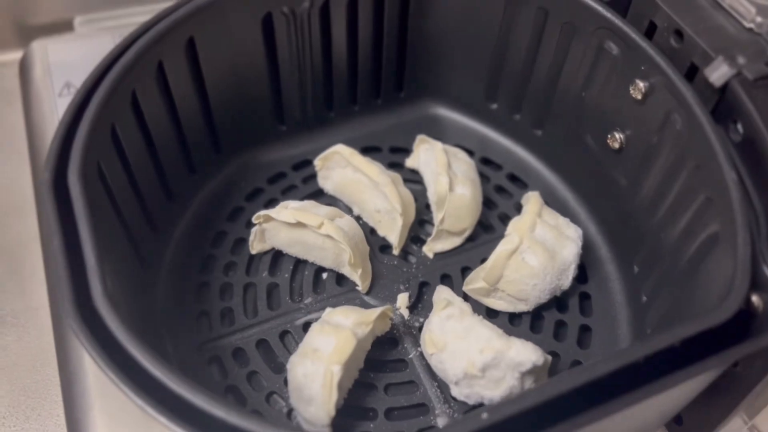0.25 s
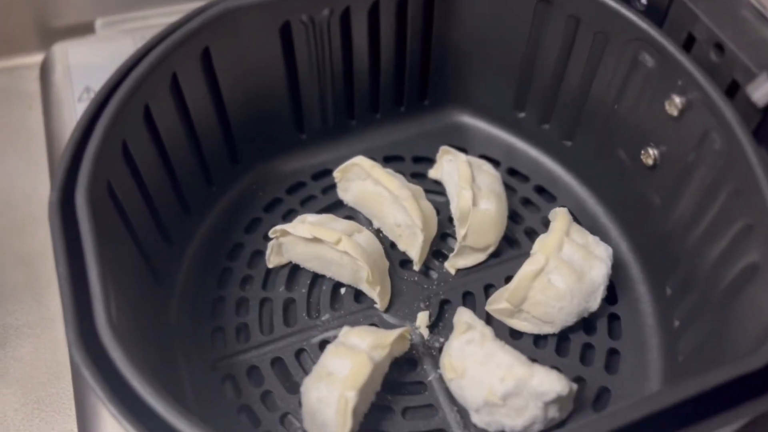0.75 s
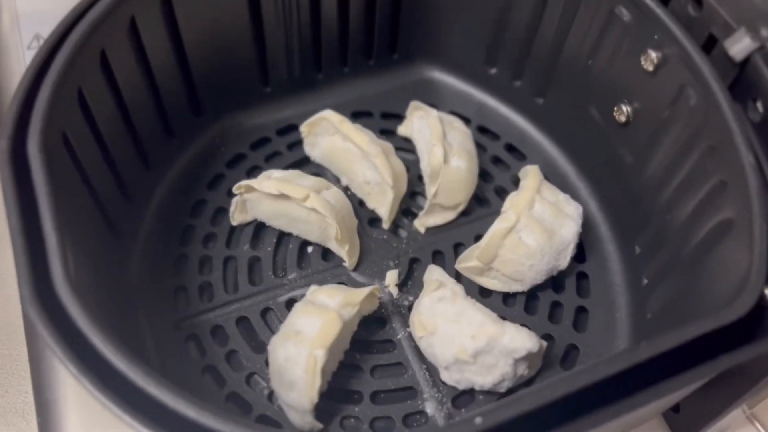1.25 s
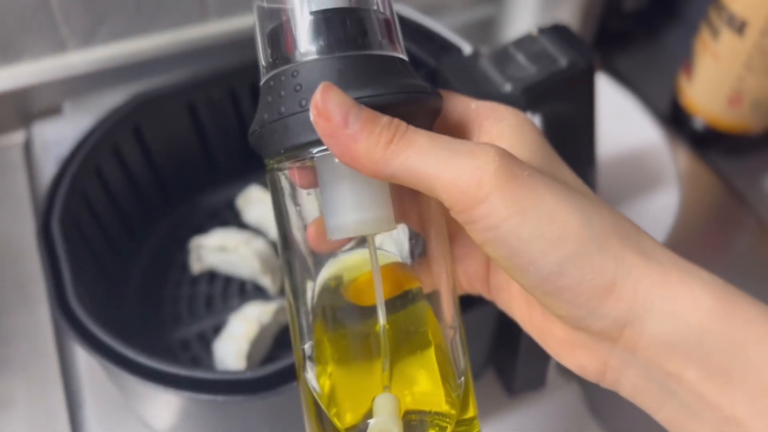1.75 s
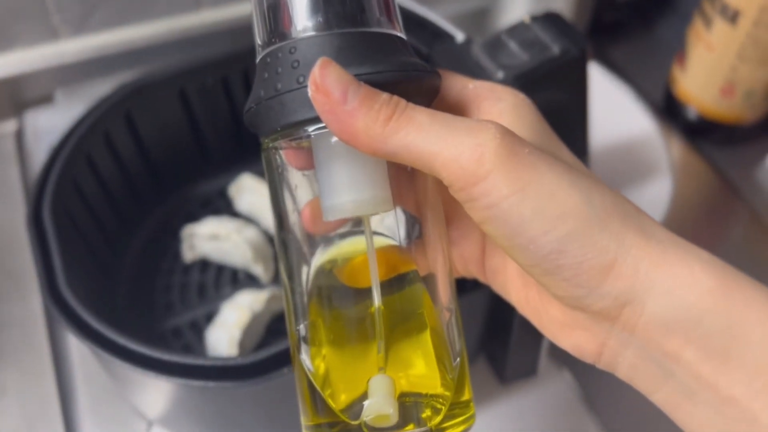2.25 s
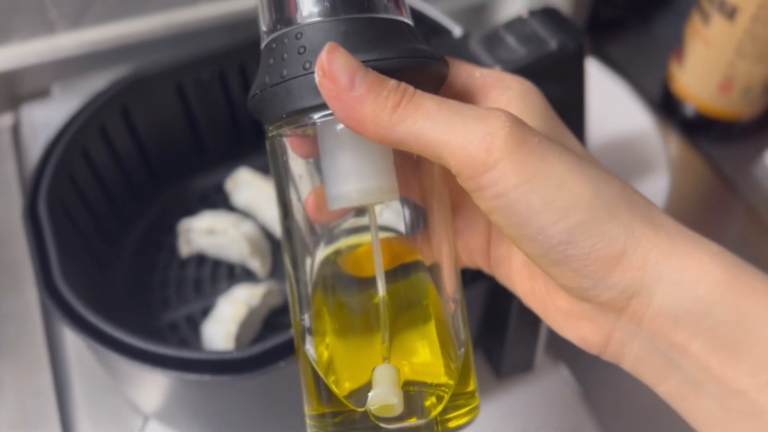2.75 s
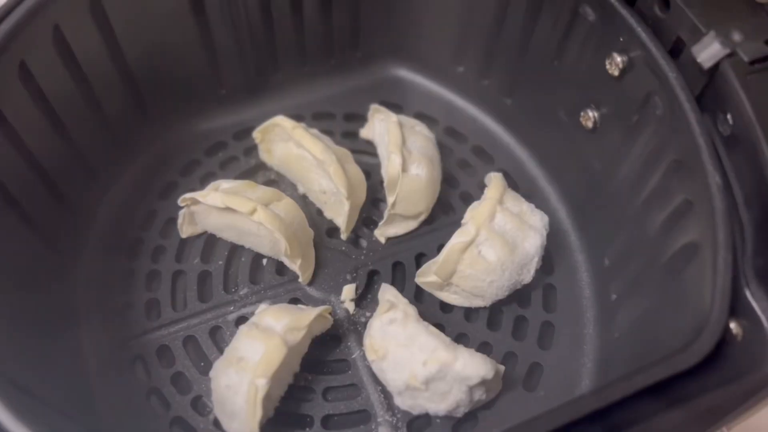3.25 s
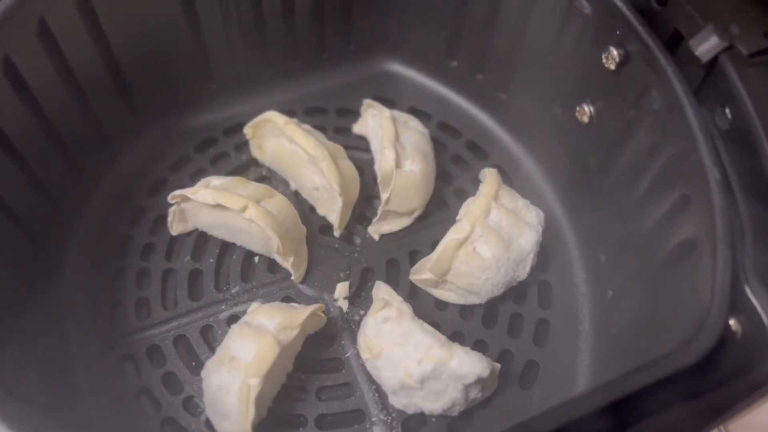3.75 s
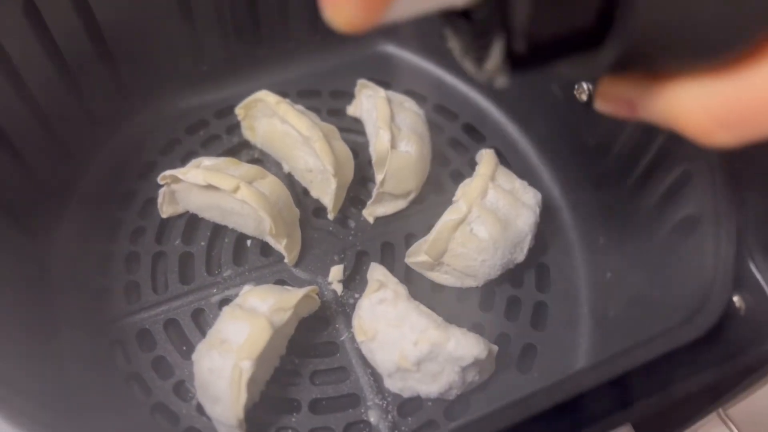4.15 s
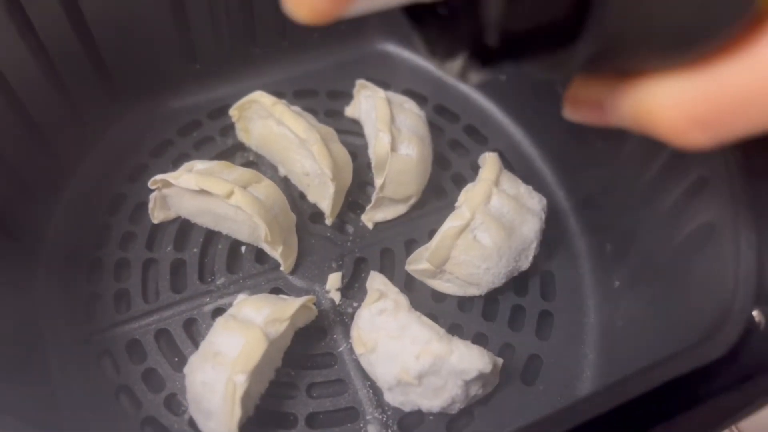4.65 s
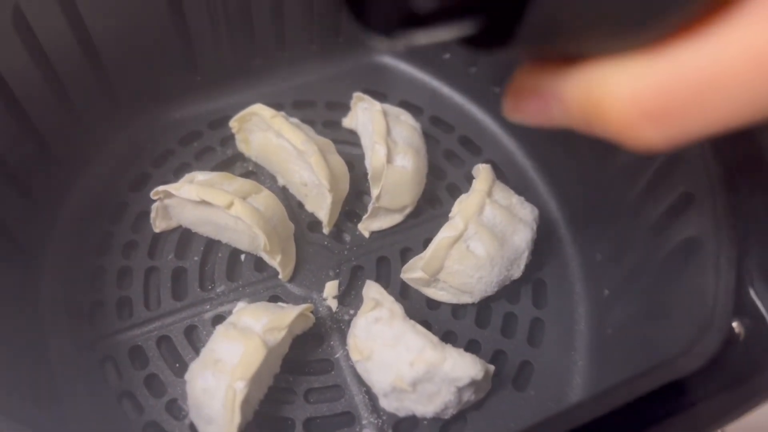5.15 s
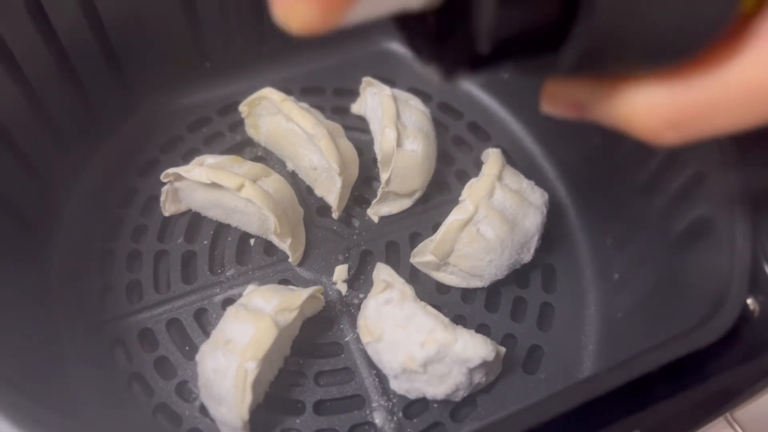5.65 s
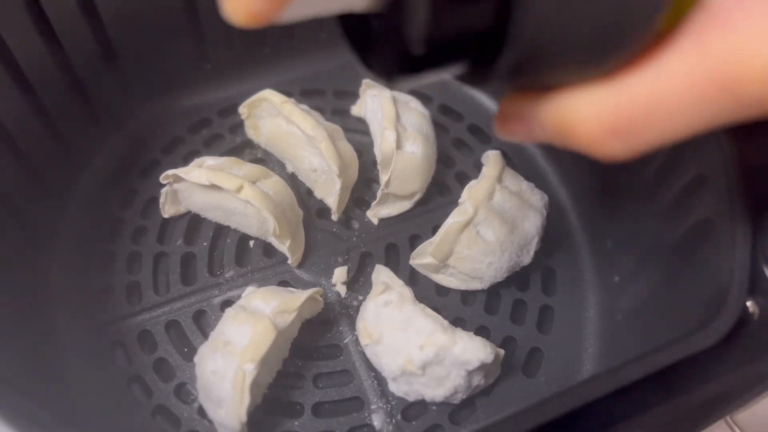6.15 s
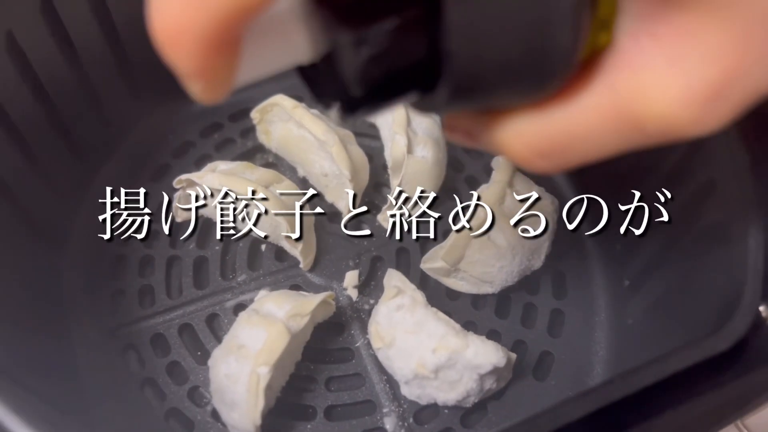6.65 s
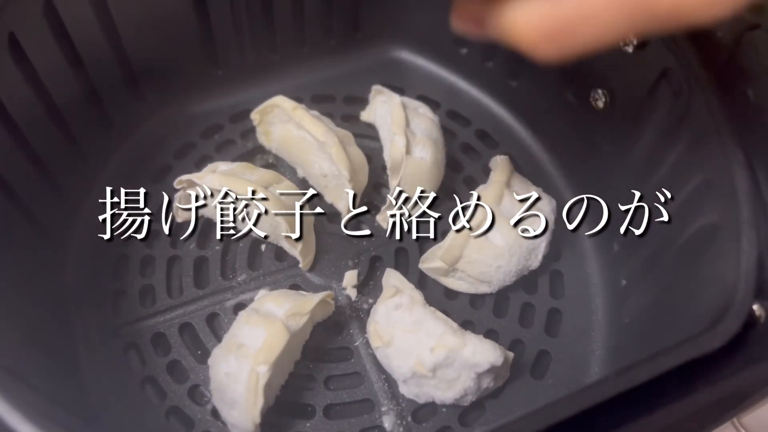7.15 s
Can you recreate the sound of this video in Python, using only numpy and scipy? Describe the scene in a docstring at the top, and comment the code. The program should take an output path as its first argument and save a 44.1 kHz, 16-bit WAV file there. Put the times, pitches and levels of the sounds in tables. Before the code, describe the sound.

An oil mister hisses in three long sprays over dumplings, after a brief air-fryer basket clatter, with one knock during the last spray.

```python
"""An oil mister sprays dumplings in an air-fryer basket, close to a phone in a quiet kitchen.
A low rumble lies under it all. Hands rustle, then the basket clatters as it is handled (about 1 s).
From 3 s the mister is pressed three times. The basket boosts some pitches of the hiss and its echoes
cancel others; these shift as the nozzle comes closer. During the last spray the bottle knocks once,
and just after it the basket takes two light bumps."""
import sys
import numpy as np
from scipy import signal
from scipy.fft import rfft, irfft, next_fast_len
from scipy.io import wavfile
from scipy.ndimage import uniform_filter1d

SR = 44100
rng = np.random.default_rng(int(sys.argv[2]) if len(sys.argv) > 2 else 0)


def master(y):
    """Save y as 16-bit WAV."""
    cut = np.clip(np.atleast_2d(y).T, -1, 1)
    pcm = np.round(cut * 32767)  # scale
    wavfile.write(sys.argv[1], SR, pcm.astype(np.int16))


N = 326984
SIZE = next_fast_len(N + SR // 2)  # samples of noise to make, with some to spare
HZ = np.fft.rfftfreq(SIZE, 1 / SR)

# presses of the trigger: open_s, shut_s, rise_s, jet_db, jet_drift_db_per_s,
# body_db, body_drift_db_per_s, wall_drift_db_per_s
PRESSES = [(3.059, 3.878, 0.00068, -40, 3, -3.5, 1, 1), (4.049, 5.244, 0.04, -38.5, 2, 1, -4.5, 4),
           (5.622, 7.163, 0.05, -35.5, -1.5, -1, 1.7, 0)]


def amp(db):
    """Turns decibels into a factor to multiply by."""
    return 10 ** (np.asarray(db) / 20)


def unit(x):
    """Scales a signal to an average (rms) size of 1."""
    return x / np.sqrt(np.mean(x ** 2) + 1e-20)


def at_pitch(points, hz=HZ, column=1):
    """Looks up a table's column at any pitch, blending between rows."""
    columns = np.transpose(points)
    return np.interp(np.log(hz + 1), np.log(columns[0] + 1), columns[column])


def over_time(points):
    """Joins rows of (time_s, value) into one value for every sample."""
    return np.interp(np.arange(N) / SR, *np.transpose(points))


def add(mix, start_s, sound):
    """Mixes a stereo sound in at start_s."""
    part = mix[:, round(start_s * SR):][:, :sound.shape[1]]
    part += sound[:, :part.shape[1]]


def pan(db):
    """Left and right gains that make the left louder by db."""
    return amp(np.array([db, -db]).reshape(2, -1) / 2)


def bell(hz, centre, width):
    """A smooth hump, 1 at its centre and one half at its edges."""
    return .5 ** ((2 * (hz - centre) / width) ** 2)


def waver(rate_hz):
    """A random wobble of size 1, mostly slower than rate_hz."""
    return unit(irfft(rfft(rng.standard_normal(SIZE)) / (1 + (HZ / rate_hz) ** 4), SIZE)[:N])


def noise_pair(likeness):
    """Spectra of left and right white noise: likeness 1 is the same noise, 0 is unrelated."""
    a, b, c, d = rng.standard_normal((4, len(HZ)))
    left, other = a + 1j * b, c + 1j * d
    same = np.clip(likeness, -1, 1)
    return np.array([left, same * left + np.sqrt(1 - same ** 2) * other])


def steady_noise(tone, likeness):
    """Stereo noise shaped by rows of (pitch_hz, level_db)."""
    return unit(irfft(noise_pair(likeness) * amp(at_pitch(tone)), SIZE)[:, :N])


def burst(t, ring_s, spread):
    """Noise that fades by 60 dB in ring_s; spread makes left and right differ."""
    common, apart = rng.standard_normal((2, len(t)))
    return np.array([common + spread * apart, common - spread * apart]) * amp(-60 * t / ring_s)


def note(t, hz, db, ring_s, phase=0):
    """One pure tone of a struck object, fading by 60 dB in ring_s."""
    return amp(db - 60 * t / ring_s) * np.sin(2 * np.pi * hz * t + phase)


def background(wander_db=1.83, air_wander_db=0.87, hiss_db=-83):
    """Low rumble and hum, nearly alike on both sides, under wavering air noise and a thin hiss."""
    # the tone of each noise: pitch_hz, level_db
    rumble_tone = [(20, -39), (45, -5), (62, 4), (80, -4.5), (105, -1), (128, -7.5), (168, -6.5),
                   (205, -18.5), (310, -24), (365, -15.5), (420, -27), (500, -23), (700, -60), (3000, -81)]
    deep_tone = [(15, -29), (28, -20.5), (47, 4), (60, -1), (80, -18.5), (200, -52.5), (600, -100)]
    hum_tone = [(130, -40.5), (155, -10.5), (168, 3), (182, -23), (230, -25), (600, -91.5)]
    air_tone = [(300, 6), (700, 3), (1200, -3), (2500, -11), (4500, -20.5), (8000, -42.5), (11000, -47.5)]
    hiss_tone = [(300, -10), (1500, -2), (7000, 4), (11000, -12)]
    # how loud each is as time passes: time_s, level_db
    rumble_levels = [(0, -44), (1.5, -46.5), (2.9, -46), (3.3, -44), (7.4, -47)]
    deep_levels = [(0, -46.5), (1.6, -47.5), (2.2, -52), (3.2, -46), (3.65, -39), (4.3, -39.5),
                   (4.65, -47.5), (7.4, -42)]
    hum_levels = [(4.3, -75), (4.7, -48.5), (5.4, -51), (6.1, -53.5), (7.2, -56.5)]
    air_levels = [(0, -61.5), (1.4, -65), (3, -65), (3.1, -55), (7.4, -56)]
    # how alike left and right are in the rumble and air: pitch_hz, likeness
    likeness_rows = [(60, 1), (150, .98), (300, .8), (450, .35), (700, -.05), (1500, .2), (4000, .5)]
    likeness = at_pitch(likeness_rows)
    rumble = steady_noise(rumble_tone, likeness)
    rumble *= amp(over_time(rumble_levels) + wander_db * waver(0.75))
    deep = steady_noise(deep_tone, 1) * amp(over_time(deep_levels))
    hum = steady_noise(hum_tone, 0.96) * amp(over_time(hum_levels))
    air = steady_noise(air_tone, likeness) * amp(over_time(air_levels) + air_wander_db * waver(5))
    hiss = steady_noise(hiss_tone, 0.45) * amp(hiss_db)
    return rumble + deep + hum + air + hiss


def hand_rustles(spread=0.5, fade_s=0.035):
    """Hands rub lightly on plastic and glass, making soft bands of noise."""
    # each rub: start_s, length_s, level_db, pitch_hz, width_octaves
    rubs = [(0, 0.28, -66.5, 2670, 1.3), (0.494, 0.48, -79, 3800, 0.78), (0.639, 0.075, -60.5, 520, 0.22),
            (1.92, .17, -84, 3500, .8), (2.313, 0.28, -81, 4500, 0.29), (5.559, 0.093, -56.5, 6000, 1.4),
            (7.327, 0.14, -60, 3500, 0.89)]
    out = np.zeros((2, N))
    for start_s, length_s, db, pitch_hz, width in rubs:
        t = np.arange(int(length_s * SR)) / SR
        octaves = np.log2((np.fft.rfftfreq(len(t), 1 / SR) + 1) / pitch_hz)
        band = (1 + (2 * octaves / width) ** 2) ** -.5
        rub = irfft(rfft(burst(t, np.inf, spread)) * band, len(t))
        fade = np.minimum(np.minimum(t, length_s - t) / fade_s, 1)
        add(out, start_s, amp(db) * unit(rub) * fade)
    return out


def basket_clatter(firm_db=-30, spread=0.62, left_db=1):
    """Each blow makes the basket ring and rattle; where it lands sets its thud and hollow panel note."""
    # blows: start_s, strength_db, extra_thud_db, extra_tick_db, rise_s, thud_hz, panel_hz, top_hz
    blows = [(.694, -54, -1, 5.5, 0.0052, 253, 472, 9000), (.706, -64, 23, 9, 0.0039, 173, 483, 9500),
             (0.738, -68, 21, 13, 0.0062, 115, 564, 10000), (.83, -40.5, -4, -14, 0.0062, 216, 460, 5500),
             (0.8378, -31.5, -11, -15, 0.0023, 188, 473, 5800),
             (0.868, -54, 14.5, 2, 0.0049, 110, 920, 6000), (.944, -45, 2, -10, .002, 240, 533, 6500),
             (0.954, -44.5, 8, -8, 0.0048, 230, 534, 8000), (0.966, -31, -2, -4.5, 0.0015, 153, 730, 8450),
             (.982, -44, 13.5, -3, .004, 138, 330, 8000), (1.002, -35.5, 0, 4.5, 0.0028, 147, 640, 8000),
             (1.008, -37, 13, 2, .0032, 206, 496, 7760), (1.034, -38, 6, -1, 0.0011, 149.5, 525, 7600),
             (1.066, -53.5, 13, 1, .004, 160, 380, 7500), (1.087, -51, -7, 4, 0.002, 260, 770, 7500),
             (1.112, -39, -4, 1, 0.0095, 203, 680, 9000), (1.131, -34.5, -2, 9.5, 0.0031, 196, 876, 9550),
             (1.142, -37.5, 1.5, -8, 0.0027, 294, 830, 9000), (1.191, -49, 5, 8, 0.001, 281, 830, 9800),
             (1.324, -69.5, 11.5, 5, 0.00081, 129, 500, 9800),
             (7.347, -50, -6.5, 1.5, 0.02, 269, 655, 7500), (7.381, -49, 6, 7, 0.0054, 167, 523, 7500)]
    # the basket's own notes: pitch_hz, level_db, ring_s
    basket_notes = [(54.7, -1, 0.16), (101.7, -4, 0.204), (147, 1, 0.11), (207.3, 0.5, 0.12),
                    (280.7, -5, 0.14), (331.5, -11, 0.17), (382, -15.5, 0.12), (415, -15, 0.12),
                    (475, -11, 0.041), (532, -13.5, 0.094), (699, -20, 0.22), (819, -24, 0.21),
                    (940, -20, 0.15), (1256, -17, 0.11), (1400, -2, 0.028), (1570, -6, .05),
                    (1766, -1, 0.033), (2140, -5, 0.038), (2500, -9, 0.049), (2930, -18, 0.16)]
    # a blow's four bands (thud, body, clack, tick): first each one's low_hz, then each one's level_db
    band_starts = [45, 400, 1100, 4000]
    band_levels = [6.5, 1, -5.5, -13.5]
    t, out = np.arange(int(.4 * SR)) / SR, np.zeros((2, N))
    for start_s, strength_db, thud_db, tick_db, rise_s, thud_hz, panel_hz, top_hz in blows:
        stretch = min(0.8 * 2 ** ((firm_db - strength_db) / 21), 1.44)  # softer blows ring longer
        ringing = sum(note(t, hz * rng.normal(1, 0.0081), db + 0.4 * rng.standard_normal(),
                           ring_s * stretch, 2 * np.pi * rng.random())
                      for hz, db, ring_s in basket_notes)
        thud = note(t, thud_hz, db=8, ring_s=0.12)
        panel = note(t, panel_hz, db=-4, ring_s=0.064)
        rattle = amp(-1) * burst(t, 0.12 * stretch, spread)
        crack = amp(6) * burst(t, 0.02 * stretch, spread)
        blow = (ringing + thud + panel + rattle + crack) * np.minimum(t / rise_s, 1) ** 2
        levels = strength_db + np.array(band_levels) + [thud_db, 0, 0, tick_db]
        for low, high, db in zip(band_starts, band_starts[1:] + [top_hz], levels):
            band = signal.sosfilt(signal.butter(3, (low, high), "band", fs=SR, output="sos"), blow)
            opening_size = np.std(band[:, :SR // 50].mean(0))
            add(out, start_s, amp(db) * band / opening_size)
    return out * pan(left_db)


def kitchen_echo(sound):
    """The room throws back scattered reflections, each pitch fading at its own speed."""
    # how long the room rings: pitch_hz, ring_s
    ring_times = [(150, 0.046), (1000, 0.33), (4000, 0.27), (7000, 0.26), (10000, 0.047)]
    echoes = rng.choice([-1., 1.], (2, SR // 2)) * (rng.random((2, SR // 2)) < .1)
    echoes[:, :SR // 200] = 0  # nothing comes back in the first 5 ms
    hz, t, spectrum = signal.stft(echoes, SR, nperseg=256)
    fade = amp(-60 * t / at_pitch(ring_times, hz)[:, None])
    tail = signal.istft(spectrum * fade, SR, nperseg=256)[1]
    return signal.fftconvolve(sound, tail / np.linalg.norm(tail[0]), axes=1)[:, :N]


def nozzle_jet():
    """The swirling jet hisses, reaching the two microphones slightly out of step."""
    # the jet in open air: pitch_hz, level_db
    jet_tone = [(120, -34), (300, -22), (450, -16), (1000, -8), (1800, -11.8), (3000, -7.7), (5000, -5.8),
                (7000, -4.2), (8700, -5), (9600, -2.2), (10600, -1.6), (11300, 1.3), (11600, -4),
                (11850, -20)]
    # the jet at the two microphones: pitch_hz, likeness, left_lead_radians
    mic_match = [(300, .9, 0), (600, .5, 1.7), (1100, .68, .9), (1800, .25, 1.2), (2500, .45, 2.4),
                 (3500, .4, 5.2), (5500, .35, 4.2), (7000, .6, 5.8), (8400, .52, 5.2), (9150, .88, 3.4),
                 (9750, .99, 3.14), (10450, .99, 3.14), (11200, .78, 2.4)]
    jet = noise_pair(at_pitch(mic_match)) * amp(at_pitch(jet_tone))
    jet[1] *= np.exp(-1j * at_pitch(mic_match, column=2))
    return irfft(jet, SIZE)[:, :N]


def basket_colour(hz, t, jet, fine_hz=9100, shared_db_per_place=-1.5):
    """The basket's ringing boosts some pitches and its echoes cut others, as the nozzle moves in."""
    # boosts (+) and cuts (-) at five places of the nozzle: pitch_hz, width_hz, level_db
    far = [(1020, 1000, 6.0), (1200, 90, 7.6), (1860, 100, 4.4), (2480, 1060, 8.9), (2780, 460, -8.0),
           (4370, 630, -3.8), (5090, 150, 5.2), (5620, 150, 4.4), (6030, 80, -3.9), (6570, 170, -3.7),
           (6780, 140, 3.0), (8300, 350, 3.7), (9650, 330, 2.7), (11300, 200, 3.6)]
    beside = [(500, 820, 2.1), (1190, 90, 5.2), (3450, 220, 4.2), (4100, 150, -7.0), (4490, 80, -5.4),
              (4670, 1580, -4.4), (4920, 120, 4.1), (5520, 300, 4.8), (6070, 380, -4.3), (7230, 360, 2.0),
              (8030, 420, -3.6), (8610, 270, 3.9), (9270, 230, 5.0), (11300, 1550, 3.6)]
    above = [(1200, 120, 7.8), (1310, 750, -3.0), (1640, 170, -2.6), (3250, 320, -3.3), (3490, 420, 9.0),
             (4150, 2000, -8), (4310, 120, 4.8), (4900, 290, 3.4), (6030, 310, -6.3), (7700, 480, -6.8),
             (8160, 160, -7.0), (8160, 2070, 2.8), (8900, 210, -4.0), (10060, 640, -2.1)]
    at_rim = [(1220, 80, 2.5), (1720, 90, -3.1), (2900, 360, 2.4), (3510, 110, 4.5), (4500, 80, -3.4),
              (5180, 770, 6.6), (6040, 110, -10.3), (6900, 230, -3.9), (7000, 1140, 5.2), (8050, 120, -6.0),
              (8560, 580, 6.8), (9030, 140, -5.5), (9380, 380, 3.1), (10830, 1600, 1.8)]
    inside = [(1200, 100, 3), (2050, 100, -3.4), (3550, 1940, 8.1), (3650, 170, -16.0), (4210, 280, -5.3),
              (5270, 1750, 8.8), (5600, 160, -8.4), (5900, 140, -16.0), (6070, 240, -13), (6560, 380, 7.8),
              (6960, 150, -3), (7270, 300, 9.5), (7980, 580, -11), (8530, 1720, 8.8), (8970, 300, -15.5),
              (10700, 630, 4.9)]
    # the nozzle's path: time_s, place (0 is far, 4 is inside)
    path = [(3.9, 0), (4.0, 1), (4.35, 1), (4.9, 2), (5.3, 2), (5.6, 3), (5.95, 3), (6.33, 4)]
    # how much louder the jet is on the left: pitch_hz, left_minus_right_db
    lean_far = [(400, 0), (1200, 9), (2300, 6), (3000, 7), (4000, 8.5), (5300, 12.5), (6300, 11),
                (7300, 5.5), (8600, -0.5)]
    lean_near = [(400, 1), (1200, 10.5), (2100, 8.5), (3400, 7.5), (4700, 8), (5600, 10.5), (7200, 7),
                 (8400, 3), (9200, -1), (10400, -.5), (11400, -2.5)]
    lean_inside = [(400, 0), (1200, 9.5), (2100, 7.5), (3400, 10), (4700, 10), (5600, 11), (7200, 5.5),
                   (8400, 2), (9200, -1)]
    places = [(far, lean_far), (beside, lean_near), (above, lean_near),
              (at_rim, lean_near), (inside, lean_inside)]
    samples = np.minimum(t * SR, N - 1).astype(int)
    place, hiss = over_time(path)[samples], 0
    # an unsteady hand slides the boosts and cuts, more so close to the basket, and changes their depth
    slide = 1 + (.003 + .0008 * place) * waver(3)[samples]
    depth = 1.2 + .18 * waver(5)[samples]
    core = (hz > 4000) & (hz < 9000)  # every place is made equally loud in this band
    for k, (humps, lean) in enumerate(places):
        basket_db = sum(db * bell(hz, centre, width) for centre, width, db in humps)
        moving_db = depth * np.interp(np.outer(hz, slide), hz, basket_db)
        sides = pan(at_pitch(lean, hz))
        heard = jet * amp(moving_db) * (sides / np.linalg.norm(sides, axis=0))[..., None]
        strength = np.std(signal.istft(heard.mean(0) * core[:, None], noverlap=768)[1])
        nearness = np.maximum(1 - abs(place - k), 0)
        hiss = hiss + nearness * heard / strength
    # the highest hiss pushes one microphone as it pulls the other; what they share drops along the path
    shared = amp(shared_db_per_place * place / (1 + (fine_hz / (hz[:, None] + 1)) ** 20))
    return hiss - (1 - shared) * hiss.mean(0)


def press_shape_db(hz, t, spit_db=5, spit_s=0.083, body_top_hz=3040):
    """Level and tone of each press: a coarse spit lifts the lower hiss, then dies as the jet drifts."""
    # a narrow whistle that builds during the first press: time_s, boost_db
    whistle_levels = [(3.2, -6), (3.5, -2.5), (3.78, 8), (3.9, -1)]
    presses = np.array(PRESSES)
    midpoints_s = (presses[:-1, 1] + presses[1:, 0]) / 2
    nearest = presses[np.searchsorted(midpoints_s, t)]
    open_s, shut_s, _, jet_db, jet_drift, body_db, body_drift, wall_drift = nearest.T
    age, hz = np.clip(t - open_s, 0, shut_s - open_s), hz[:, None]
    spit = spit_db * np.exp(-age / spit_s)
    body = (body_db + body_drift * age + spit) / (1 + (hz / body_top_hz) ** 4)
    # the basket wall throws back a broad band, which grows when the nozzle swings in
    wall = (-0.5 + wall_drift * age) * bell(hz, centre=4800, width=1770)
    whistle = np.interp(t, *np.transpose(whistle_levels)) * bell(hz, centre=5120, width=190)
    air_puff = 11.5 * bell(hz, centre=233.6, width=160)
    return jet_db + jet_drift * age + body + wall + whistle + air_puff


def droplet_spatter(shape, pitch_steps=7, time_steps=6):
    """Uneven droplets make random patches, a few hundred Hz wide and a few hundredths of a second long."""
    smoothed = uniform_filter1d(rng.standard_normal(shape), pitch_steps, 0)
    return unit(uniform_filter1d(smoothed, time_steps, 1))


def oil_spray(spatter_db=1.2, flutter_db=0.98, sputter_db=.5, closing_s=0.037):
    """The jet hisses while the trigger holds the valve open, coloured by the basket."""
    clock = np.arange(N) / SR
    valve = sum(np.clip((clock - open_s) / rise_s, 0, 1) * np.clip((shut_s - clock) / closing_s, 0, 1) ** 2
                for open_s, shut_s, rise_s, *_ in PRESSES)
    hz, t, jet = signal.stft(nozzle_jet(), SR, nperseg=1024, noverlap=768)  # a grid of pitch and time
    grid = basket_colour(hz, t, jet)
    grid *= amp(press_shape_db(hz, t) + spatter_db * droplet_spatter(grid.shape[1:]))
    hiss = signal.istft(grid, noverlap=768)[1][:, :N]
    breakup_db = flutter_db * waver(29) + sputter_db * waver(400.5)  # the oil breaks up unevenly
    return hiss * valve * amp(breakup_db)


def near_echoes(sound, count=6, first_s=.003, last_s=.012, echo_db=-19, drift_s=.00009, sway_hz=0.406):
    """Echoes off the hob and wall ripple the hiss; their delays drift with the hand."""
    n, out = np.arange(N), sound.copy()
    for distance, sign, speed, phase in rng.random((count, 4)):
        sway = np.sin(2 * np.pi * (sway_hz * speed * n / SR + phase))
        delay_s = first_s + (last_s - first_s) * distance + drift_s * sway
        echo = np.array([np.interp(n - delay_s * SR, n, side) for side in sound])
        out += np.sign(sign - .5) * amp(echo_db) * echo
    return out


def bottle_knock(crack_rise_s=0.0024, left_db=7):
    """The hard cap cracks and clacks at once; the heavy bottle swells more slowly into a dull thump."""
    # the knock: start_s, crack_db, clack_db, thump_db
    knock = (6.232, -23.5, -18.5, -9.5)
    # the tone of the cap's crack: pitch_hz, level_db
    crack_tone = [(400, 7), (750, -15), (1100, -3.5), (1850, -4), (2350, -6), (3150, 2.5), (3700, -20),
                  (5000, -3.5), (10000, -40)]
    # the cap's notes: pitch_hz, level_db, ring_s
    cap_notes = [(1060, -21, 0.055), (1700, -9.5, 0.091), (1955, -10.5, 0.056), (2040, -13, .05),
                 (3104, 1.5, 0.022), (3250, -2.5, 0.025), (4250, -12, .05), (4870, -9, 0.041)]
    # the notes of bottle and hand: pitch_hz, level_db, ring_s, rise_s, left_lead_radians
    bottle_notes = [(47.7, -5, 0.23, 0.018, 0.14), (67, -8.5, 0.24, 0.016, 0),
                    (103.4, -7.5, 0.2, 0.0068, 0.087), (135, .5, 0.08, 0.0102, -0.025),
                    (173, 2.5, 0.09, 0.01, -0.8), (229, -5.5, 0.063, 0.0073, 0.2),
                    (286, -5.5, 0.085, 0.0078, 0.29), (320, -9.5, 0.08, 0.00687, 0),
                    (520, -5, 0.18, 0.0056, 1.5), (599, -12, 0.09, 0.00636, 1.8)]
    start_s, crack_db, clack_db, thump_db = knock
    t, out = np.arange(SR // 2) / SR, np.zeros((2, N))
    onset = np.minimum(t / crack_rise_s, 1)
    rattle = onset * (burst(t, ring_s=.02, spread=0.84) + amp(-15) * burst(t, ring_s=.16, spread=0.94))
    colour = amp(at_pitch(crack_tone, np.fft.rfftfreq(len(t), 1 / SR)))
    crack = irfft(rfft(rattle) * colour, len(t))[:, :SR // 4]
    add(out, start_s, amp(crack_db) * pan(left_db) * crack / np.std(crack[:, :SR // 100]))
    clack = onset * sum(note(t, *row) for row in cap_notes)
    add(out, start_s, amp(clack_db) * pan(left_db) * clack)
    for hz, db, ring_s, rise_s, lead in bottle_notes:
        phase = lead * np.array([[.5], [-.5]]) - 2 * np.pi * hz * rise_s
        swell = np.minimum(t / rise_s, 1) ** 2
        add(out, start_s, amp(thump_db) * swell * note(t, hz, db, ring_s, phase))
    return out


def scene(spray_room_db=-20, blow_room_db=-14):
    """Mist and blows echo in the kitchen, over the rustles and the rumble."""
    mist = near_echoes(oil_spray())
    blows = basket_clatter() + bottle_knock()
    room = kitchen_echo(amp(spray_room_db) * mist + amp(blow_room_db) * blows)
    return mist + blows + room + hand_rustles() + background()


def record(dry, mono_hz=150, top_hz=11850):
    """The phone's two microphones sit close, so they share the bass; it cuts the highest treble."""
    mid, side = dry.mean(0), (dry[0] - dry[1]) / 2
    side = irfft(rfft(side, SIZE) * HZ ** 2 / (HZ ** 2 + mono_hz ** 2), SIZE)[:N]
    treble_cut = signal.firwin(401, top_hz, window=("kaiser", 9), fs=SR)
    return signal.oaconvolve(np.array([mid + side, mid - side]), treble_cut[None], "same", axes=1)


dry = scene()
out = record(dry)
master(out)
```